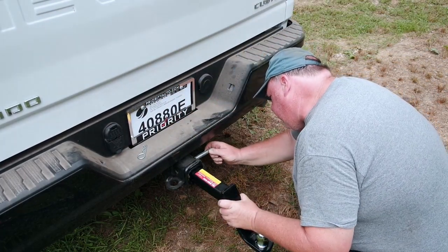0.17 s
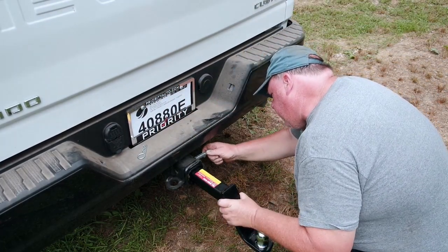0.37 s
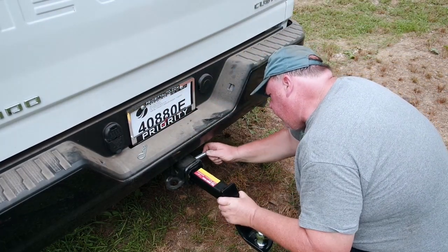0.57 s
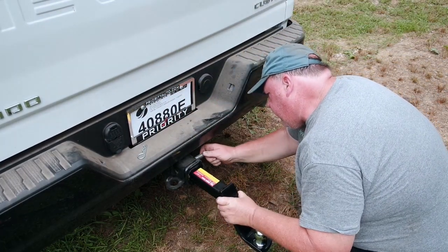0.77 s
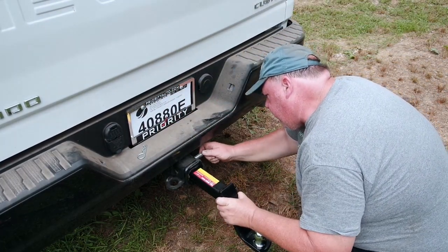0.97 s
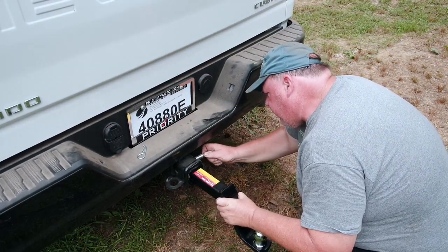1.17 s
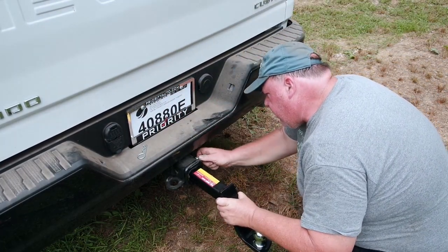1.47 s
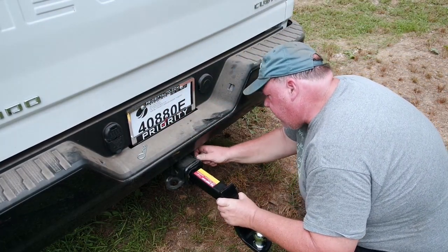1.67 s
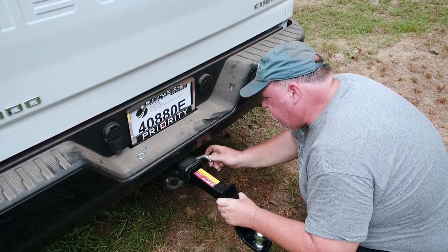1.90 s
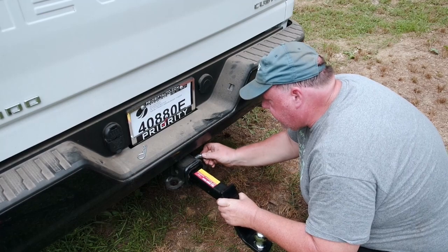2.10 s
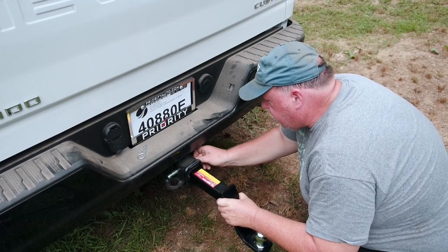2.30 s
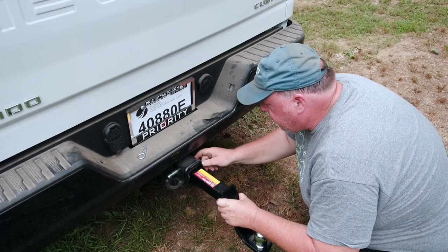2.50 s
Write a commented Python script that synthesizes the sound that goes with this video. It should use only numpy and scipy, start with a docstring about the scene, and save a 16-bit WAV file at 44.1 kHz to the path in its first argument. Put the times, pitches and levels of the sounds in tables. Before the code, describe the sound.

Metal hitch parts clank in a truck receiver, heard close in mono over faint outdoor air and hiss. Light pin clicks at 0.1-0.2 s; squeaky scrapes from 0.4 lead into a heavy clank and low frame thud near 0.48. Irregular knocks and scrapes follow, with strong hollow thuds around 1.33 and 1.5. Softer knocks lead to a small rattle at 2.1, a scrape at 2.25 and a bright ringing snap at 2.32.

```python
"""Faint outdoor air and hiss, then clicks and scrapes as a steel hitch pin is worked against a receiver's hole.
The ball mount shifts in the tube: its loose shank clanks (decaying modes plus a dense noise ring)
and thuds into the truck's frame (slow low modes and a noise boom). Scrapes are grains of noise with a squeal.
At the end the pin rattles and snaps home: ticks, a band-passed crack and bright decaying modes."""
import sys
import numpy as np
from scipy import signal
from scipy.fft import rfft, irfft
from scipy.io import wavfile

SR = 44100
rng = np.random.default_rng(int(sys.argv[2]) if len(sys.argv) > 2 else 0)


def output_pcm(signal):
    """Save a mono or channel-first signal as 16-bit PCM at the path in sys.argv[1].

    Samples are clipped to [-1, 1] before scaling.
    """
    pcm = np.clip(np.atleast_2d(signal).T, -1, 1) * 32767
    wavfile.write(sys.argv[1], SR, np.round(pcm).astype(np.int16))


N = 116865

CRACK_S = 0.002  # time scale of a steel contact

# modes of the pin struck on its side: pitch_hz, level_db, t60_s
PIN_SIDE = [(2196, -18.5, 0.1), (3030, -21, 0.091), (3576, -16, .075), (4180, -18.5, .085),
            (5290, -9.5, 0.063), (7670, -16, 0.11), (8190, -21, .2), (8940, -16, 0.12),
            (11350, -14.5, 0.095)]


def amp(db):
    """Decibels to gain."""
    return 10 ** (np.asarray(db) / 20)


def unit(x):
    """Scales to energy one."""
    return x / np.sqrt(np.sum(x ** 2) + 1e-20)


def read(points, hz):
    """Interpolates (Hz, value) points on a log-frequency axis."""
    f, value = np.transpose(points)
    return np.interp(np.log(hz + 1), np.log(f + 1), value)


def add(mix, s, sound):
    """Adds a sound into the mix at time s, cut at the end."""
    part = mix[max(round(s * SR), 0):][:len(sound)]
    part += sound[:len(part)]


def colour(x, points):
    """Minimum-phase filter with the given (Hz, dB) shape."""
    size = 4096
    log_gain = np.log(amp(read(points, abs(np.fft.fftfreq(size, 1 / SR)))))
    spectrum = np.exp(np.conj(signal.hilbert(log_gain)))
    taps = np.fft.ifft(spectrum).real
    return signal.fftconvolve(x, taps[:size // 2])[:len(x)]


def decay(t, t60):
    """Exponential decay by 60 dB in t60 s, held at one before t = 0."""
    return np.exp(-np.log(1000) * np.maximum(t, 0) / t60)


def fade(t, rise, t60):
    """Straight rise, then exponential decay."""
    return np.minimum(t / rise, 1) * decay(t - rise, t60)


def background():
    """Faint outdoor air and a hiss of drifting level, both shaped noise, both lower before the first click."""
    # air spectrum: pitch_hz, level_db
    air_shape = [(25, 0.5), (150, 18), (400, -13), (1420, -27.5), (3730, -15.5), (15000, -44)]
    # treble hiss: time_s, level_db
    hiss_levels = [(.095, -72.5), (.11, -52.5), (.65, -57), (1.4, -48), (1.62, -61.5), (2.3, -45.5),
                   (2.42, -60)]
    air_db, quiet_db, stir_s = -56, -34, 0.094
    t = np.arange(N) / SR
    air = unit(colour(rng.standard_normal(N), air_shape))
    air *= amp(air_db + quiet_db * (t < stir_s))
    hiss = unit(colour(rng.standard_normal(N), [(500, 11.5), (4000, -1.0), (8500, -7.0)]))
    hiss *= amp(np.interp(t, *np.transpose(hiss_levels)))
    return np.sqrt(N) * (air + hiss)


def ring(modes, t, rise):
    """Decaying partials that build up while the contact lasts."""
    out = np.zeros(len(t))
    for hz, db, t60 in modes:
        partial = np.sin(2 * np.pi * (hz * t + rng.random()))
        out += amp(db) * unit(fade(t, rise, t60) * partial)
    return out


def dense(t, rise):
    """Crowded uneven modes of bumper and underbody: a crack, a ring slower and longer in the bass, a faint tail."""
    # ring of bumper and underbody: centre_hz, t60_s
    ring_times = [(150, 0.57), (450, 0.27), (1000, 0.17), (2000, 0.11), (4000, 0.093), (8000, 0.084),
                  (15000, 0.062)]
    mode_spacing_hz, uneven_db, uneven_from_hz = 45, 6, 2600
    build_cycles, crack_db = 3.9, 7
    tail_db, tail_longer = -16.5, 1.78  # tail from under the truck; t60 ratio
    hz = np.fft.rfftfreq(len(t), 1 / SR)
    spots = np.arange(0, SR / 2, mode_spacing_hz)
    strengths = np.clip(rng.standard_normal(len(spots)), -2, 2)
    uneven = np.interp(hz, spots, strengths) * np.minimum(hz / uneven_from_hz, 1)
    gain = unit(amp(uneven_db * uneven)) * np.sqrt(len(hz))
    noise = rfft(rng.standard_normal(len(t))) * gain
    centres = [f for f, _ in ring_times]
    crack = 1 + amp(crack_db) * np.exp(-t / CRACK_S)
    out = np.zeros(len(t))
    # each share is one at its own centre, so the bands crossfade
    for share, (centre, t60) in zip(np.eye(len(centres)), ring_times):
        band = irfft(noise * read(list(zip(centres, share)), hz), len(t))
        build = rise + build_cycles / centre
        tail = amp(tail_db) * fade(t, build, t60 * tail_longer)
        out += band * unit(fade(t, build, t60) * crack + tail)
    return out


def knocks():
    """Each steel contact rings the tube and the pin or shank; its hardness sets the colour."""
    # knocks: start_s, rise_s, six level_db at colour_hz, tube_ring_db, ringing part, part_ring_db
    contacts = [ (0.1021, 0.0016, -1, 11, 12, 3.5, -2, -9.5, 1, "pin tip", 5.5),
                (0.1527, 0.0018, 6.5, 7.5, 7, -2.5, -3, -26, 4, "pin tip", -4),
                (0.2018, 0.0011, 13, 11.5, 14.5, 5, -1, -21, -1, "pin gripped", 3.5),
                (0.4731, 0.0044, 16, 19.5, 8.5, -6.5, 9.5, 6.5, -1.5, "shank", 4.5),
                (.482, 0.0035, 25.5, 21, 16.5, -11, -9, -29, 0, "shank", 0),
                (0.563, 0.0022, 5.5, 18, 13, -17, -23, -27, 5.5, "shank", 8),
                (0.6123, 0.00076, 11.5, 0, 17, 0, -3, -18, -11, "pin tip", -21),
                (0.742, 0.0018, 8, 6, 6, -6, -15.5, -39, -0.5, "pin tip", -9),
                (0.9258, 0.0033, 3, 3.5, 7, -7, -24, -43, 0, "shank", -16),
                (1.019, 0.0046, 17.5, 9, 1, 0, -19, -22, 0.5, "shank", 6.5),
                (1.159, 0.0014, 1.5, 9, 8, -1.5, -3.5, -26.5, -10, "pin tip", -19),
                (1.191, 0.0034, 21, 5.5, 0, -0.5, -29, -32, 0.5, "shank", 1),
                (1.2944, 0.0052, 7.5, 10, 5, 3.5, -23.5, -25.5, 4, "shank", -2.5),
                (1.333, 0.0042, 26, 8.5, 6.5, -8, -13, -11.5, 1, "shank", -14),
                (1.4933, 0.00058, 24, 19.5, 19.5, 3.5, -13, -17.5, 3, "shank", -6),
                (1.818, 0.01, 15.5, 4.5, 6, -28.5, -29.5, -22.5, -2.5, "shank", 5.5),
                (1.9771, 0.0031, 14, 14, 11, 4.5, -14.5, -19, -1, "pin tip", -1.5),
                (2.015, 0.0011, 18.5, 8, 0, -13, -18, -26, -2.5, "pin tip", -17),
                (2.1165, 0.004, 18.5, 14.5, 11, 1.5, -27.5, -27.5, -0.5, "pin side", 6.5),
                (2.237, 0.0051, 0, 7, -2, -12, -39, -27.5, 1, "shank", -8.5),
                (2.3146, 0.001, 5, 16, 17, 12, 5, -5, 1, "shank", -4)]
    # pitch_hz of the six levels
    colour_hz = [500, 1400, 2400, 4200, 7500, 13000]
    # modes of tube, pin tip and shank: pitch_hz, level_db, t60_s
    tube = [(446.6, -24.5, 0.085), (553.2, -23.5, 0.13), (708.6, -25.5, 0.23), (1013, -26.5, 0.23),
            (1553, -24.5, 0.14), (1875.5, -13, 0.084), (2222, -25.5, .09), (2510, -37, 0.13),
            (3220, -19.5, 0.062), (3840, -26.5, 0.16), (4180, -23.5, 0.17)]
    pin_tip = [(3435, -13, 0.037), (6380, -9.5, 0.02), (7100, -11.5, 0.071), (8840, -11, 0.041),
               (10400, -14, 0.045)]
    shank = [(4246, -11, 0.042)]
    gripped = [(hz, db, t60 * 0.65) for hz, db, t60 in PIN_SIDE]  # fingers shorten the ring
    parts = {"pin tip": pin_tip, "pin side": PIN_SIDE, "pin gripped": gripped, "shank": shank}
    bass_hz, bass_db = 102, -7.5  # dB against the level at 500 Hz
    out, t = np.zeros(N), np.arange(SR // 2) / SR
    for s, rise, *levels, tube_db, part, part_db in contacts:
        steel = dense(t, rise)
        steel += amp(tube_db) * ring(tube, t, rise)
        steel += amp(part_db) * ring(parts[part], t, rise)
        low = levels[0]
        bass = [(bass_hz / 2, low + 2 * bass_db), (bass_hz, low + bass_db), (bass_hz * 2, low + 1.5)]
        add(out, s, colour(steel, bass + list(zip(colour_hz, levels))))
    return out


def thuds():
    """The shank shakes the frame, which swells slowly and hums on; resonances shift as the load moves."""
    # shank landings: start_s, rise_s, level_db (relative to frame_db)
    landings = [(0.12, 0.03, 17), (0.205, 0.016, 18), (.487, .018, 41.5), (0.563, 0.019, 33.5),
                (.612, 0.015, 34), (.70, 0.018, 30), (.805, 0.02, 19.5), (1.024, 0.023, 34.5),
                (1.195, 0.014, 33), (1.295, .02, 34), (1.336, 0.015, 41), (1.445, .02, 33.5),
                (1.497, 0.01424, 39.5), (1.613, 0.0048, 17), (1.721, 0.042, 16), (1.826, .02, 18),
                (2.019, 0.016, 31), (2.119, 0.022, 23), (2.318, 0.0077, 18)]
    # frame modes: pitch_hz (before shift), level_db, t60_s
    frame = [(112, -14, 0.8), (122.5, -11.5, 0.15), (143.2, -1, 0.24), (189.4, -7, 0.75),
             (283.3, -20.5, 0.28), (381.3, -18, 0.13), (485, -13, 0.074), (602, -16, 0.2)]
    # crowded frame modes, as a noise spectrum: pitch_hz, level_db
    boom_shape = [(30, -20), (70, -1.5), (130, -0.5), (220, 4.5), (450, -10), (800, -15.5), (2000, -44)]
    frame_db, boom_db, boom_t60_s = -29, -8, 0.4
    frame_shift = 0.027  # largest upward share
    out, t = np.zeros(N), np.arange(SR) / SR
    for s, rise, db in landings:
        shifts = 1 + frame_shift * rng.uniform(-0.78, 1, len(frame))
        modes = np.zeros(len(t))
        for (hz, level, t60), shift in zip(frame, shifts):
            partial = np.sin(2 * np.pi * hz * shift * (t - rise))
            modes += amp(level) * unit(fade(t, rise, t60) * partial)
        boom = unit(colour(rng.standard_normal(len(t)), boom_shape) * fade(t, rise, boom_t60_s))
        add(out, s, amp(db + frame_db) * (modes + amp(boom_db) * boom))
    return out


def scrapes():
    """Quick tiny slips rattle the tube; where they lock in step, a squeal of unsteady pitch sounds."""
    # strokes: start_s, length_s, level_db, squeal_hz, squeal_db, treble_db
    strokes = [(0.403, 0.0085, -42, 2240, -1, 0), (0.436, 0.015, -39, 2130, 2.5, -7),
               (0.455, 0.023, -30, 2215, -0.5, -9), (0.583, 0.03, -33, 1880, -4.5, -6.5),
               (0.614, 0.018, -37.5, 2550, -1, -7), (0.674, 0.093, -41, 1890, -7.5, -4.5),
               (1.45, 0.066, -29.5, 2300, -20, -8.5), (2.074, 0.039, -38.5, 2470, -10, -7),
               (2.255, 0.0755, -37, 1810, -14.5, -9)]
    # rub spectrum: pitch_hz, level_db (before treble_db)
    rub_shape = [(60, 5), (200, 3.5), (1100, 5), (1900, 4), (5000, -9), (8000, -15), (15000, -22)]
    grains_per_s, grain_spread_db = 1600, 3.5
    squeal_t60_s, body_t60_s, rise_s = 0.05, 0.046, 0.0034
    squeal_wander = 0.029  # share by which pitch follows the uneven pressure
    out, t = np.zeros(N), np.arange(SR // 4) / SR
    for s, length, db, squeal_hz, squeal_db, treble_db in strokes:
        slips = rng.standard_normal(len(t)) * amp(grain_spread_db * rng.exponential(1, len(t)))
        slips *= rng.random(len(t)) < grains_per_s / SR
        onset = np.minimum(t / rise_s, 1)
        body = unit(rng.standard_normal(len(t)) * fade(t, 1 / SR, body_t60_s))
        rub = signal.fftconvolve(slips * onset * (t < length), body)[:len(t)]
        rub = colour(rub, [(hz, level + treble_db * (hz > 4000)) for hz, level in rub_shape])
        # a new random pressure every rise_s
        pressure = np.interp(t / rise_s, np.arange(len(t)), rng.standard_normal(len(t)))
        turns = np.cumsum(squeal_hz * (1 + squeal_wander * pressure)) / SR
        squeal = np.sin(2 * np.pi * turns) * amp(2 * pressure)
        squeal *= onset * decay(t - length, squeal_t60_s)
        mixed = unit(rub) + amp(squeal_db) * unit(squeal)
        add(out, s, amp(db) * np.sqrt(length * SR) * mixed)
    return out


def rattle():
    """The loose pin bounces in its hole: each contact is a tick and a bright ring, low-passed."""
    # bounces: start_s, level_db
    bounces = [(2.111, 0.5), (2.1225, 4), (2.139, -3)]
    tick_db, lowpass_hz = -13, 3480
    out, t = np.zeros(N), np.arange(SR // 4) / SR
    for s, db in bounces:
        tick = unit(rng.standard_normal(len(t)) * np.exp(-t / CRACK_S))
        contact = amp(tick_db) * tick + ring(PIN_SIDE, t, 1 / SR)
        add(out, s, amp(db) * signal.lfilter(*signal.butter(1, lowpass_hz, fs=SR), contact))
    return out


def seat():
    """The pin, driven home, cracks against the wall of the tube and rings."""
    # modes of the seated pin: pitch_hz, level_db, t60_s
    seated = [(2562, -1.5, .095), (2810, 3.5, 0.026), (3200, -2.5, .07), (3833, -3.5, 0.14),
              (4160, -1, 0.12), (4390, -5.5, 0.076), (5080, -4.5, .07), (6080, -3, 0.06), (6490, 0.5, 0.05),
              (7670, -12.5, 0.12), (8780, -11.5, 0.12), (10640, -9.5, 0.065)]
    # band of the crack: low_hz, high_hz
    snap_band = [1707, 6700]
    seat_s, snap_db = 2.3162, 9.5
    out, t = np.zeros(N), np.arange(SR // 2) / SR
    burst = rng.standard_normal(len(t)) * t * np.exp(-2 * t / CRACK_S)
    snap = unit(signal.lfilter(*signal.butter(2, snap_band, "bandpass", fs=SR), burst))
    add(out, seat_s, amp(snap_db) * snap + ring(seated, t, CRACK_S))
    return out


def scene():
    """Sums all sources to one channel."""
    return (background() + knocks() + thuds() + scrapes() + rattle() + seat())[None]


def record(dry):
    """Band limit of the recorder: a linear-phase low-pass."""
    edge_hz = 15100
    taps = signal.firwin(255, edge_hz, window=("kaiser", 9), fs=SR)
    return signal.oaconvolve(dry, taps[None], "same")


dry = scene()
out = record(dry)
output_pcm(out)
```